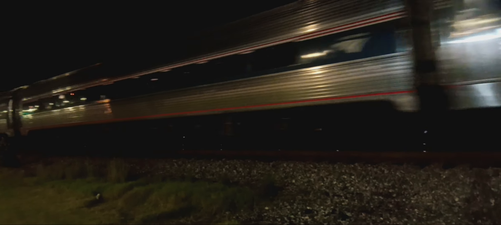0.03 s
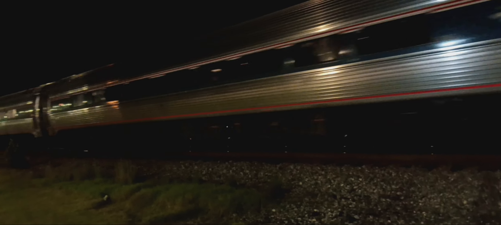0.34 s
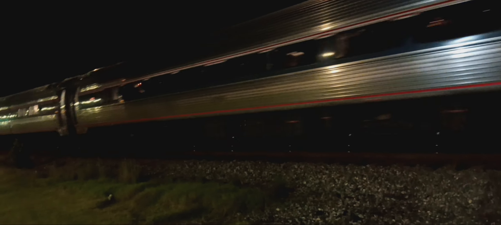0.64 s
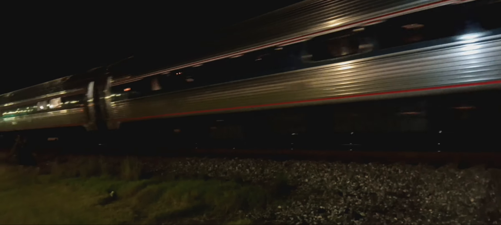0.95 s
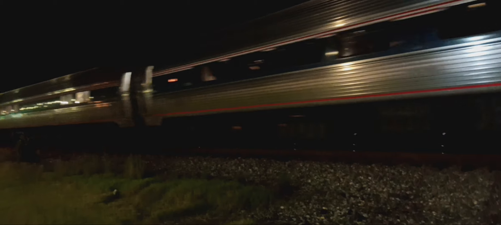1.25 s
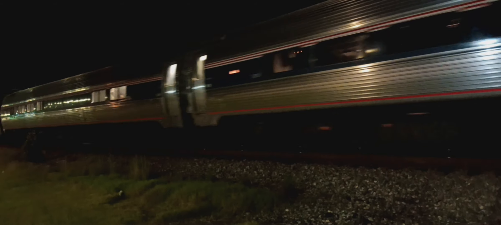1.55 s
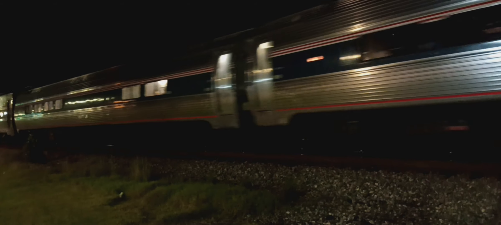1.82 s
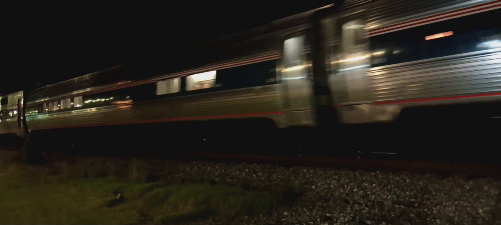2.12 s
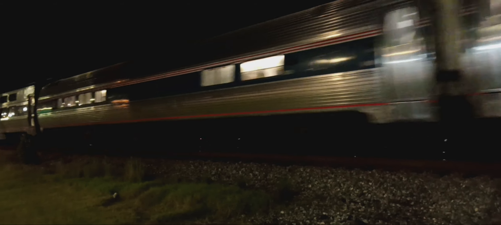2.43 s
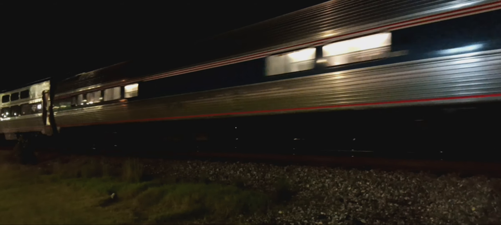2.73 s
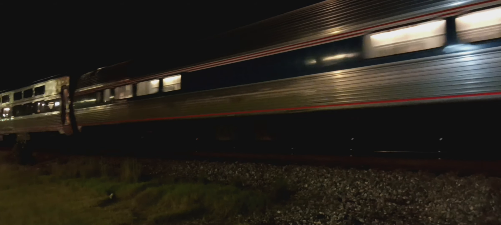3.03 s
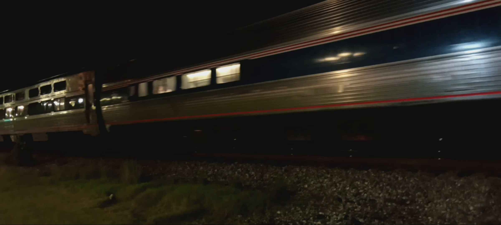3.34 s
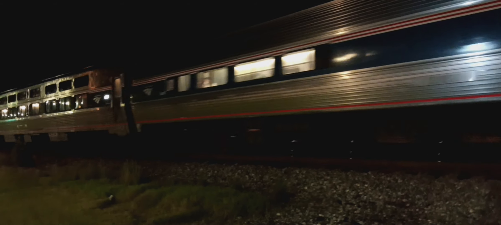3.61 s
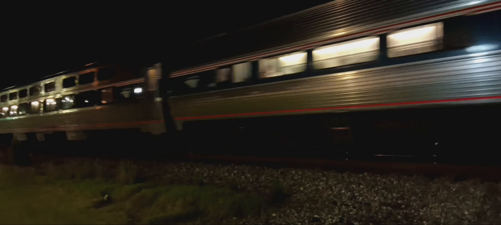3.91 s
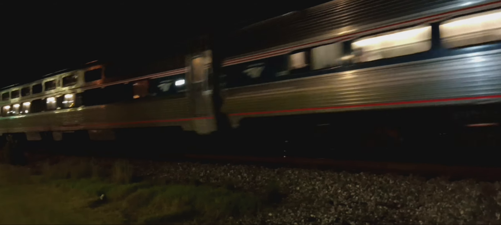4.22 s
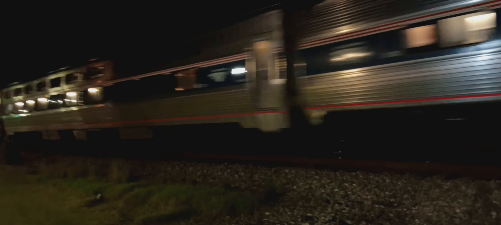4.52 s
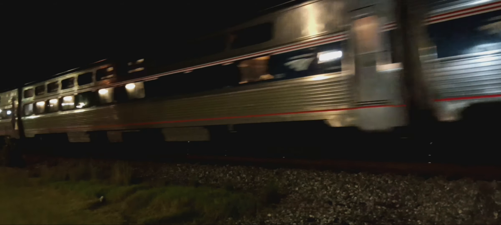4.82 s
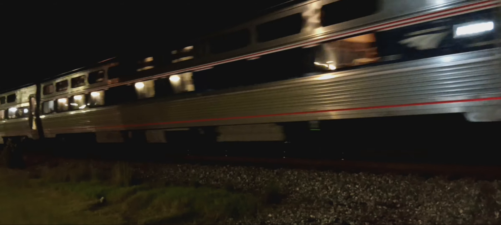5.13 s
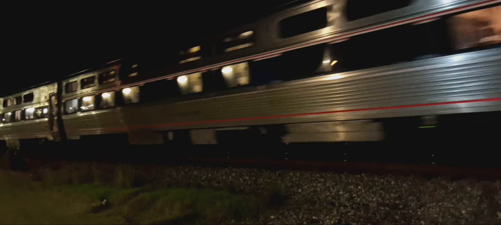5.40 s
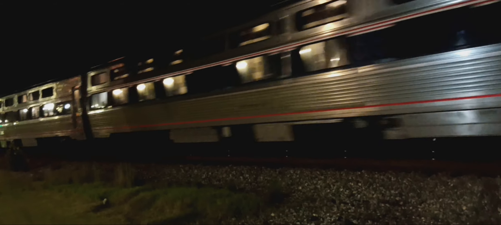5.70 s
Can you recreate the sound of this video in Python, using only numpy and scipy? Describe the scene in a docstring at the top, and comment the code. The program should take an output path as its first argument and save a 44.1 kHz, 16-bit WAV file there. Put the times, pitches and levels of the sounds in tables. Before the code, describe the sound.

A passenger train rolls past a few metres away for nearly six seconds, already alongside at the start. Its cars roar steadily over a low compressor hum and a faint fan. Throughout, steel wheels grind on the rail with a harsh, pulsing hiss, high ringing and thin, raspy squeals that overlap at different pitches, each sinking slightly as the wheels go by. Two sets of wheels pass in the first second, their wind thumping on the left side of the microphone. A longer, piercing squeal stands out from about 1.3 to 2.8 seconds. Near 3 seconds a third set brings the loudest roar, with a cluster of gusts between 2.3 and 3.4 seconds. Another set passes near 4.7 seconds with more buffeting, and a weaker one near 5.6 seconds. The roar leans a little to the left, and the squealing continues to the end.

```python
"""A passenger train rolls past a few metres away, one bogie (a frame with wheels) after another.
From the start the cars roar and hum, and the wheel rims grind on the rail, so the steel hisses,
rings and squeals, sinking in pitch as each bogie goes by. Two pass in the first second, and their
wind thumps on the left microphone. Near 3 s a third brings the loudest roar and more gusts.
Two more follow near 4.7 s and 5.6 s. Throughout, a limiter holds back the loudest peaks."""
import sys
import numpy as np
from scipy import signal
from scipy.fft import rfft, irfft, next_fast_len
from scipy.io import wavfile
from scipy.ndimage import uniform_filter1d, minimum_filter1d, map_coordinates

SR = 44100
rng = np.random.default_rng(int(sys.argv[2]) if len(sys.argv) > 2 else 0)


def wav_record(signal):
    """Record a signal, one row per channel, as 16-bit PCM in the file named by sys.argv[1]."""
    frames = np.transpose(np.atleast_2d(signal))
    bounded = np.clip(frames, -1, 1)
    # unit amplitude maps onto the largest positive 16-bit level
    quanta = np.round(bounded * 32767).astype(np.int16)
    wavfile.write(sys.argv[1], SR, quanta)


N = 254016  # 5.76 s

# Levels compare rows within a table. A lean above 0 means louder on the left.
# Bogies going by: (passing time [s], share of the ringing [dB], roar level [dB], roar half length [s])
BOGIES = [(0.049, -0.5, -30.5, 0.14), (.64, -2.5, -31, .35), (2.95, 1.5, -28, 0.85), (4.7, 1, -31, 0.31),
          (5.62, -0.5, -38.5, 0.09)]
# The rolling roar swells, in short bumps or a longer stretch: (start [s], end [s], level [dB])
ROAR_SWELLS = [(0.46, 0.618, -32.5), (0.77, 0.82, -33), (1.943, 2.6, -36), (2.912, 2.99, -23.5),
               (4.406, 4.642, -33), (4.88, 4.98, -35)]
# Tone colours of the rolling roar, the grinding hiss and the fine fizz: (frequency [Hz], level [dB])
ROAR_COLOUR = [(20, -24), (45, -4), (80, -1), (130, -0.5), (250, -1.5), (400, 0.5), (650, 0), (1100, 2),
               (1700, 1), (2600, 0), (5000, -33), (10000, -50)]
HISS_COLOUR = [(500, -55), (1300, -33), (1900, -11.5), (2600, -7.5), (3500, -3), (5000, -1.5), (6500, 1.5),
               (7600, -3), (9500, -3.5), (11000, -7.5), (13000, -18), (16000, -40)]
FIZZ_COLOUR = [(5000, -62), (9000, -30), (11500, 5), (13000, 7), (14500, 5.5), (16000, -1)]
# How strongly the grinding rims hiss, fizz and make the wheels ring: (time [s], level [dB])
HISS_LEVELS = [(0, -21), (0.15, -23), (0.4, -23.7), (0.46, -20.5), (0.76, -21.5), (0.92, -24), (1.38, -25),
               (1.78, -23), (1.98, -21.7), (2.95, -19.5), (3.05, -21.5), (3.8, -20.5), (4.0, -24),
               (4.55, -21), (5.1, -20), (5.48, -26.5), (5.55, -19.5), (5.76, -24)]
FIZZ_LEVELS = [(0, -23.5), (0.35, -29), (0.46, -24), (0.74, -19), (0.82, -23.3), (1.35, -26.5),
               (2.05, -20.5), (2.65, -19), (2.95, -25), (3.15, -19.5), (3.4, -24), (3.85, -22.5),
               (4.35, -23.5), (4.93, -21), (5.13, -21), (5.22, -26.5), (5.5, -30), (5.66, -21.5)]
RING_LEVELS = [(0.0, -15), (0.85, -16.5), (1.7, -17.5), (2.0, -15.5), (2.9, -15.5), (3.7, -13), (4.15, -15),
               (5.05, -17.5), (5.4, -18), (5.76, -13.5)]
# How alike the track noise is on both sides: (frequency [Hz], likeness [-1 to 1])
STEREO_LIKENESS = [(60, 0.68), (120, 0.98), (240, 0.082), (480, 0.002), (950, -0.11), (1900, 0.075),
                   (4000, -0.094), (15000, -0.039)]
# Which side the track noise favours: (frequency [Hz], lean [dB])
STEREO_LEAN = [(60, -.5), (240, 1), (480, 2.5), (950, 5), (1900, 5), (3800, 2), (7500, 1), (9500, -6),
               (12000, -0.5), (15000, -4)]
# Hums of the compressors under the cars: (pitch [Hz], half width [Hz], level [dB])
COMPRESSOR_HUMS = [(79.7, 15, -2.5), (170, 15, -13), (171, 270, -13.5)]
# A cooling fan under the cars: (time [s], level [dB])
FAN_LEVELS = [(0, -53), (.3, -45), (1.1, -54), (1.8, -53), (2.6, -36.5), (3.6, -46.5), (4.1, -34.5),
              (4.8, -47), (5.4, -36.5), (5.76, -64)]
# The notes a steel wheel naturally rings at: (pitch [Hz], half width [Hz], level [dB], lean [dB])
WHEEL_NOTES = [(1918, 44, -18, 6), (2840, 44, -11, 5), (3886, 50, -8, 7), (4560, 124, -9.5, 7),
               (5000, 180, -11, 5), (5994, 110, -3.5, 6), (6988, 144, 1, 4), (8080, 147, 0, 13),
               (9187, 130, 1, -4), (10060, 315, -2.5, -4.5), (11120, 150, -9.5, -6), (13120, 120, -14, -4),
               (12900, 120, -25, 7), (14500, 130, -13.5, 4)]
# A wheel locks onto one note: (start [s], end [s], pitch halfway [Hz], level [dB], lean [dB])
SQUEALS = [(0, 0.4, 9205, -23, -3), (0.12, 0.38, 7995, -13, 8), (0.3, 0.52, 11194, -23, -6),
           (0.46, 0.57, 7003, -14.5, 1), (0.55, 0.78, 13667, -27, -13), (0.8, 0.96, 6914, -15, 2),
           (1.01, 1.22, 6884, -14, 5), (1.05, 1.36, 8309, -20, 11), (1.1, 1.65, 1958, -39, 4),
           (1.2, 2.0, 9382, -23, -1), (1.31, 1.6, 7217, -11, 10), (1.6, 2.2, 7198, -12.5, 4),
           (1.72, 1.81, 7076, -11, 1), (2.2, 2.85, 7140, -15, 2), (2.0, 2.8, 14996, -26.5, 8),
           (2.15, 2.23, 8266, -15.5, 11), (2.2, 2.8, 10390, -22, -7), (2.83, 3.0, 10225, -13.5, -8),
           (2.87, 3.0, 7060, -11.5, 0), (3.2, 3.7, 10060, -19.5, -8), (3.2, 3.55, 6962, -18.5, 5),
           (3.23, 3.3, 8107, -14.5, 5), (3.3, 3.8, 9015, -19, 0), (3.6, 3.85, 9190, -17, -2),
           (3.62, 3.98, 9381, -20, -2), (3.96, 4.16, 8083, -14, 10), (4.38, 4.65, 6040, -24, 4),
           (4.5, 4.62, 9138, -16, -1), (4.61, 4.68, 7023, -12.5, 2), (4.75, 5.16, 13600, -25, -8),
           (4.88, 5.03, 5892, -18, 1), (4.95, 5.12, 7985, -16, 8), (5.14, 5.23, 6915, -20, 8),
           (5.22, 5.28, 4800, -27, 3), (5.53, 5.62, 2900, -32, 4)]
# Gusts on the microphone: (start [s], end [s], thump level [dB], flutter level [dB])
GUSTS = [(0.031, 0.121, -21.5, -27), (0.48, 0.615, -22.5, -20), (0.75, 0.82, -21.5, -20.5),
         (2.288, 2.46, -26, -25), (2.584, 2.77, -25.5, -27), (2.853, 3.0, -21, -21),
         (3.07, 3.097, -23, -29), (3.179, 3.2, -14.5, -23), (3.22, 3.292, -21, -21.5),
         (3.396, 3.432, -24.5, -28.5), (4.45, 4.548, -29, -29), (4.588, 4.704, -24, -19.5),
         (4.874, 4.972, -29.5, -27)]
# Tone colours of the wind's low thump and higher flutter: (frequency [Hz], level [dB])
THUMP_COLOUR = [(12, -22), (30, -1.5), (60, 1.5), (130, -2.5), (240, -6), (400, -14), (1000, -50)]
FLUTTER_COLOUR = [(80, -8), (220, -1), (350, -1), (550, -1), (1000, -6), (1800, -10.5), (3500, -9.5),
                  (8000, -52)]


def amp(db):
    """Turn decibels into a number to multiply by."""
    return 10 ** (np.asarray(db) / 20)


def unit(x):
    """Scale a signal to an average power of 1."""
    return x / np.sqrt(np.mean(x ** 2) + 1e-20)


def along(points, hz):
    """Read between the rows of a (frequency, value) table, with octaves evenly spaced."""
    freqs, values = np.transpose(points)
    return np.interp(np.log(hz + 1), np.log(freqs + 1), values)


def shape(colour):
    """Turn a tone colour table into a gain for each frequency."""
    return lambda hz: amp(along(colour, hz))


def curve(rows):
    """Join (time, level) rows with straight lines, one value per sample."""
    return np.interp(np.arange(N) / SR, *np.transpose(rows))


def wobble(rate, size=N):
    """A smooth curve through `rate` random values a second."""
    return map_coordinates(rng.standard_normal(int(size * rate / SR) + 4), [np.arange(size) * rate / SR])


def gate(t, start, end, rise_s, fall_s):
    """A gain that builds up until start, holds, and dies away after end."""
    return np.exp(np.minimum(0, np.minimum((t - start) / rise_s, (end - t) / fall_s)))


def filtered(x, response):
    """Turn each frequency of x up or down by response(hz)."""
    size = next_fast_len(x.shape[-1] + SR // 4)
    hz = np.fft.rfftfreq(size, 1 / SR)
    return irfft(rfft(x, size) * response(hz), size)[..., :x.shape[-1]]


def pan(lean_db):
    """Left and right gains that keep the total power the same."""
    gains = np.vstack([amp(lean_db / 2), amp(-lean_db / 2)])
    return gains / np.sqrt(np.mean(gains ** 2, axis=0))


def resonance(hz, centre_hz, width_hz):
    """The power of a steep peak around one pitch."""
    return 1 / (1 + ((hz - centre_hz) / width_hz) ** 2) ** 2


def track_noise(colour, patchy_db):
    """Stereo noise beside the track, with random louder and softer patches in time and pitch."""
    spectra = signal.stft(rng.standard_normal((2, N)), nperseg=512)[2]
    patches = uniform_filter1d(rng.standard_normal(spectra.shape[1:]), size=4, axis=0)
    patches = uniform_filter1d(patches, size=16, axis=1)
    noise = signal.istft(spectra * amp(patchy_db * unit(patches)), nperseg=512)[1][:, :N]
    # both sides share "mid" and get "side" with opposite signs
    angle = lambda hz: np.arccos(np.clip(along(STEREO_LIKENESS, hz), -1, 1)) / 2
    mid, side = filtered(noise, lambda hz: colour(hz) * [np.cos(angle(hz)), np.sin(angle(hz))])
    left_right = np.array([mid + side, mid - side])
    return unit(filtered(left_right, lambda hz: pan(along(STEREO_LEAN, hz))))


def rolling_roar(rub, far_db=-43):
    """Rough wheels roar as each bogie goes by, with extra swells, over a faint roar from far away."""
    t = np.arange(N) / SR
    bogie_power = sum((amp(db) / (1 + ((t - passing) / reach) ** 2) ** 0.99) ** 2
                      for passing, _, db, reach in BOGIES)
    swell_power = sum((amp(db) * gate(t, start, end, rise_s=0.03, fall_s=0.013)) ** 2
                      for start, end, db in ROAR_SWELLS)
    level = np.sqrt(bogie_power + swell_power + amp(far_db) ** 2)
    flicker = amp(4.5 + 1.44 * wobble(18) + 0.37 * rub)
    return level * flicker * track_noise(shape(ROAR_COLOUR), patchy_db=0.7)


def grinding(rub):
    """Wheel rims slide on the rail: a harsh hiss and a fine fizz pulse with the rubbing."""
    hiss = amp(curve(HISS_LEVELS) + 6.5 + 0.53 * rub) * track_noise(shape(HISS_COLOUR), patchy_db=1.66)
    fizz = amp(curve(FIZZ_LEVELS) + 1 + 0.72 * rub) * track_noise(shape(FIZZ_COLOUR), patchy_db=1.0)
    return hiss + fizz


def machinery(fan_hz=361, fan_width_hz=16):
    """Compressors under the cars drone without a break; a fan's hum swells as its car draws near."""
    drone = lambda hz: np.sqrt(sum(amp(db) ** 2 * resonance(hz, centre, width)
                                   for centre, width, db in COMPRESSOR_HUMS))
    blades = lambda hz: np.sqrt(resonance(hz, fan_hz, fan_width_hz))
    compressors = amp(-35 + 2.1 * wobble(3.15)) * track_noise(drone, patchy_db=0)
    fan = amp(curve(FAN_LEVELS)) * track_noise(blades, patchy_db=1.5)
    return compressors + fan


def doppler(since_passing_s):
    """Pitch factor of a bogie at about 10 m/s, 6 m away: higher as it comes, lower as it leaves."""
    return 1 - .03 * since_passing_s / np.hypot(since_passing_s, .62)


def wheel_ring(reach_s=0.7, lead_s=0.24, flicker_db=3.0):
    """Grinding rings all the wheel notes at once; each bogie's notes sink as it passes."""
    t = np.arange(N) / SR
    size = next_fast_len(N + SR // 2)
    hz = np.fft.rfftfreq(size, 1 / SR)
    notes = np.sqrt(sum((amp(db) * pan(lean)) ** 2 * resonance(hz, centre, width)
                        for centre, width, db, lean in WHEEL_NOTES))
    ring, power = np.zeros((2, N)), np.zeros(N)
    for passing, db, _, _ in BOGIES:
        steel = unit(irfft(rfft(rng.standard_normal((2, size))) * notes, size))
        position = np.cumsum(doppler(t - passing))  # reading more slowly lowers the pitch
        sinking = np.array([map_coordinates(side, [position]) for side in steel])
        share = amp(db) / np.hypot(1, (t - passing + lead_s) / reach_s)  # peaks just before passing
        ring += share * unit(amp(flicker_db * wobble(24))) * sinking
        power += share ** 2
    return amp(curve(RING_LEVELS) + 2.5) * ring / np.sqrt(power)


def nearest_bogie(time_s):
    """The passing time of the bogie that is closest at this moment."""
    return min((row[0] for row in BOGIES), key=lambda passing: abs(passing - time_s))


def brief_squeals(count=30, level_db=-25, spread_db=2, longest_s=0.179):
    """More rows like SQUEALS: weak squeals break out at random on the nearest bogie's wheel notes."""
    rows = []
    for when, note, length, strength in rng.random((count, 4)):
        hz, _, note_db, lean_db = WHEEL_NOTES[int(note * len(WHEEL_NOTES))]
        start = when * N / SR
        pitch = hz * doppler(start - nearest_bogie(start))
        db = level_db + note_db + spread_db * (2 * strength - 1)
        rows.append((start, start + length * longest_s, pitch, db, lean_db))
    return rows


def squeals(waver_hz=6, flicker_db=2.5, rasp=0.31, rasp_rate=260, build_s=.03, fade_s=.05):
    """A wheel sticks and slips quickly, feeding one note: a raspy tone builds, holds and rings out."""
    out = np.zeros((2, N))
    for start, end, hz, db, lean_db in SQUEALS + brief_squeals():
        span = np.arange(max(0, int((start - 4 * build_s) * SR)), min(N, int((end + 4 * fade_s) * SR)))
        t, size = span / SR, len(span)
        halfway = (start + end) / 2
        passing = nearest_bogie(halfway)
        pitch = hz * doppler(t - passing) / doppler(halfway - passing) + waver_hz * wobble(39.46, size)
        tone = np.exp(2j * np.pi * np.cumsum(pitch) / SR)
        level = amp(db - 1.07 + flicker_db * wobble(33.6, size)) * gate(t, start, end, build_s, fade_s)
        for side, gain in enumerate(pan(lean_db)):
            # the tone reaches each side over shifting paths; higher notes are raspier
            paths = np.exp(1j * wobble(5.32, size))
            chatter = rasp * np.sqrt(hz / 8000) * (wobble(rasp_rate, size) + 1j * wobble(rasp_rate, size))
            out[side, span] += gain * level * unit((tone * (paths + chatter)).real)
    return out


def chimes(count=200, low_hz=4200, high_hz=14500, spread_db=6, attack_s=0.0091, ring_s=0.46):
    """Brief slips make other steel parts sing faintly at random pitches, louder when grinding is strong."""
    t = np.arange(SR // 2) / SR
    out = np.zeros((2, N + len(t)))
    envelope = (1 - np.exp(-t / attack_s)) * amp(-60 * t / ring_s)
    for when, pitch, strength, place, path in rng.random((count, 5)):
        hz = low_hz * (high_hz / low_hz) ** pitch
        cycles = hz * np.cumsum(doppler(t)) / SR
        tone = np.sin(2 * np.pi * (cycles + np.array([[0], [path]])))  # the sides are out of step
        gain = amp(-13 + spread_db * strength) * pan(along(STEREO_LEAN, hz) + 8 * (place - .5))
        start = int(when * N)
        out[:, start:start + len(t)] += gain * envelope * tone
    return amp(curve(HISS_LEVELS) + 10) * out[:, :N]


def wind_gusts(lumpy_db=3.5, shelter_db=-14, surge_db=2, calm_db=-46):
    """Swirls of air thrown off by the bogies beat on the left microphone; the right one is sheltered."""
    t = np.arange(N) / SR
    gust_power = sum((amp([[thump_db], [flutter_db]]) * gate(t, start, end, 0.027, 0.03)) ** 2
                     for start, end, thump_db, flutter_db in GUSTS)
    thump_level, flutter_level = np.sqrt(amp(calm_db) ** 2 + gust_power)
    swirls = amp(lumpy_db * np.array([wobble(110), wobble(110)]))
    air = lambda colour: unit(filtered(swirls * rng.standard_normal((2, N)), shape(colour)))
    thump = thump_level * amp(-0.7 + surge_db * wobble(22.09)) * air(THUMP_COLOUR)
    flutter = flutter_level * amp(2.5) * air(FLUTTER_COLOUR)
    return (thump + flutter) * amp([[0], [shelter_db]])


def scene():
    """The train and the air that it drags along."""
    rub = wobble(21.8)  # uneven rubbing of the turning wheels, shared by roar, hiss and fizz
    train = rolling_roar(rub) + grinding(rub) + machinery() + wheel_ring() + squeals() + chimes()
    return train + wind_gusts()


def record(dry, ceiling=1.25, hold_s=0.008, drive_db=0.07, top_hz=15720):
    """A fast limiter turns big peaks down, anything still past 1 is clipped, and the top treble is cut."""
    x = dry * amp(drive_db)
    needed_gain = np.minimum(1, ceiling / (np.abs(x).max(axis=0) + 1e-9))
    window = int(hold_s * SR)
    gain = uniform_filter1d(minimum_filter1d(needed_gain, window), window)
    return filtered(np.clip(x * gain, -1, 1), lambda hz: hz < top_hz)


dry = scene()
out = record(dry)
wav_record(out)
```